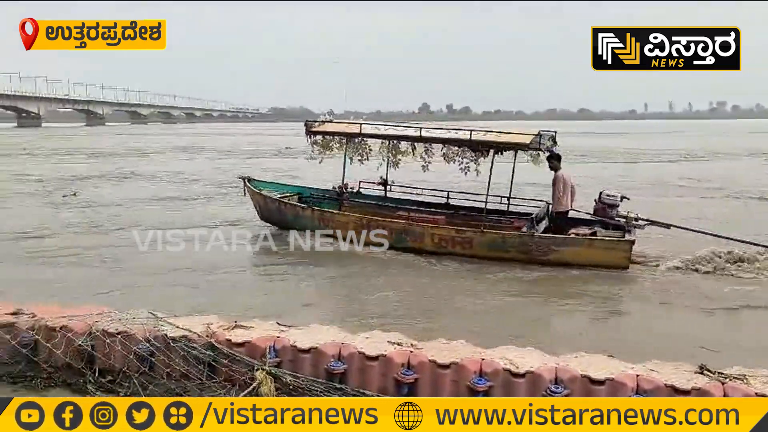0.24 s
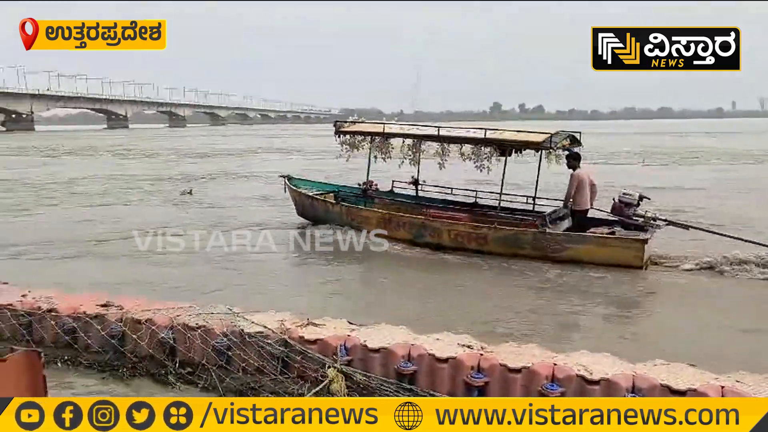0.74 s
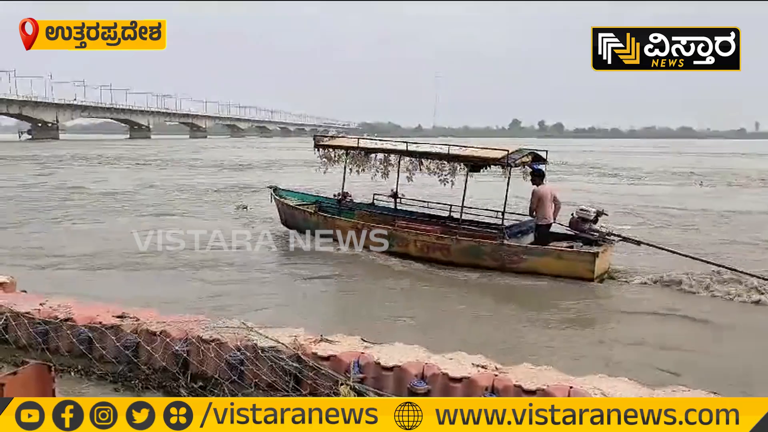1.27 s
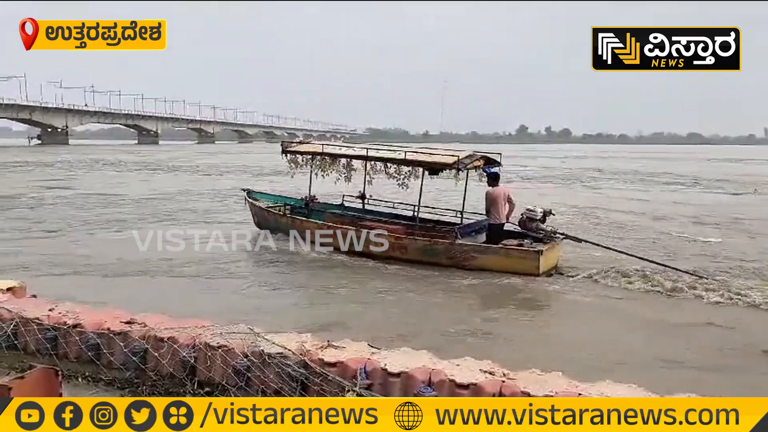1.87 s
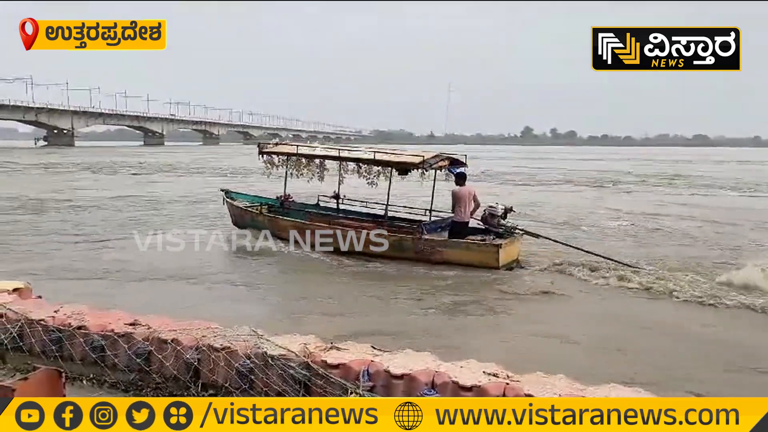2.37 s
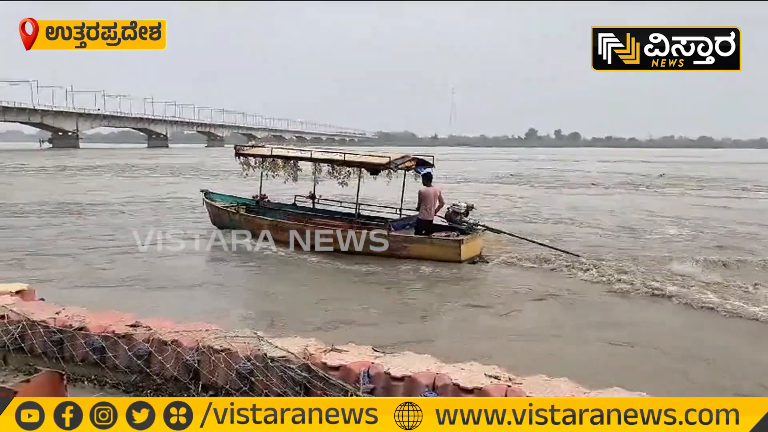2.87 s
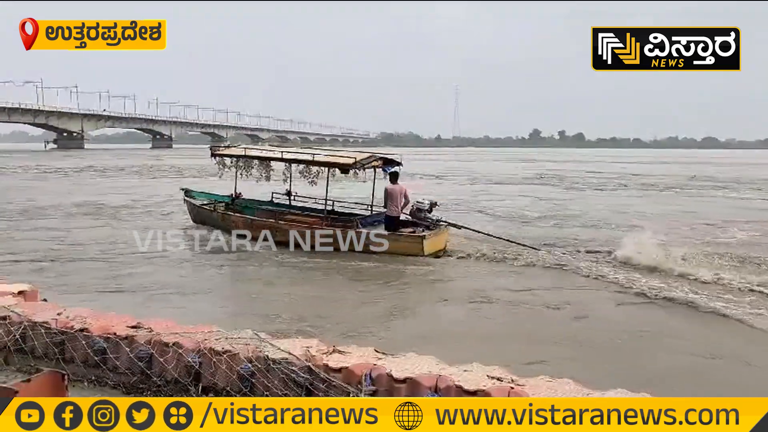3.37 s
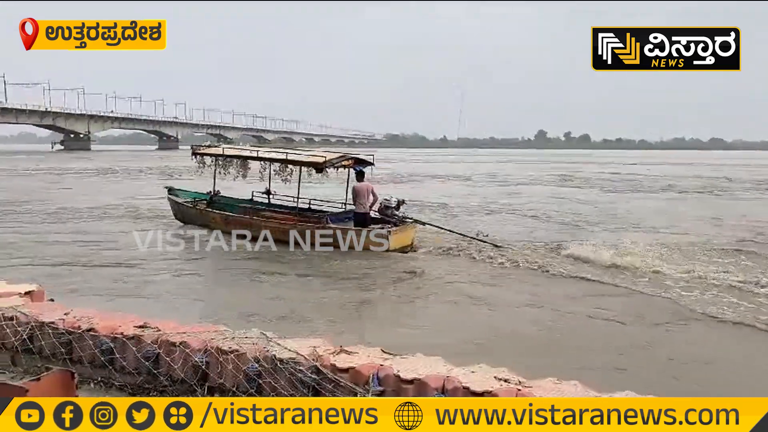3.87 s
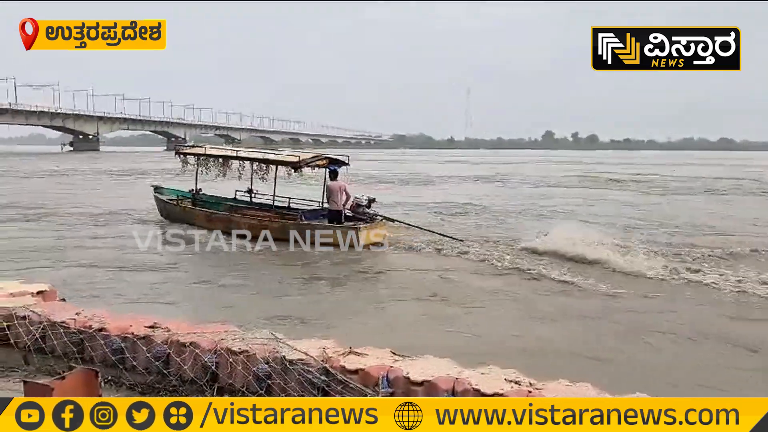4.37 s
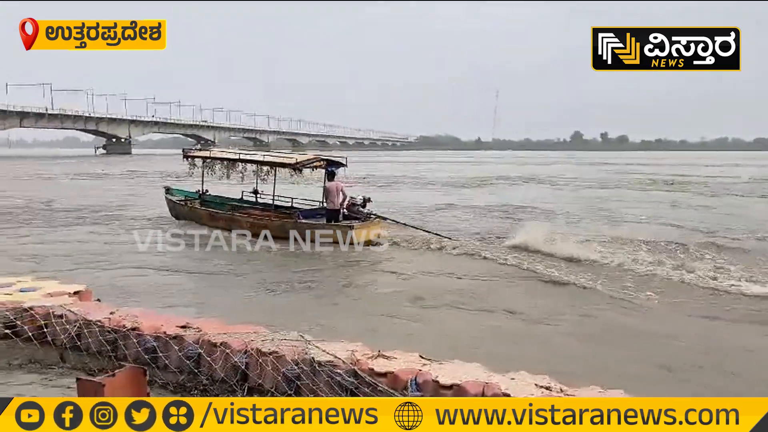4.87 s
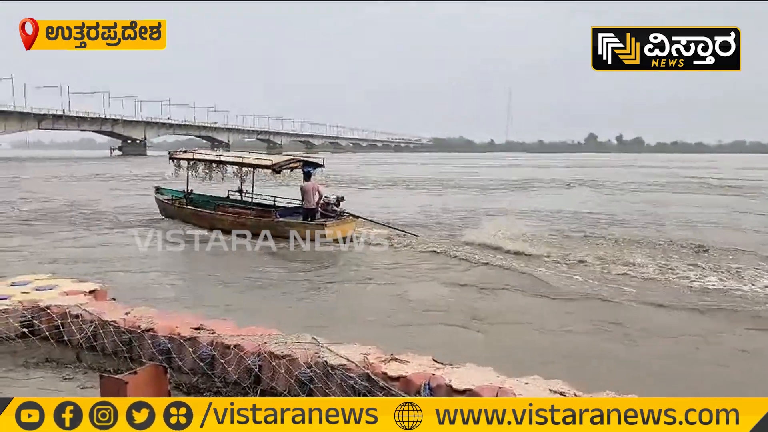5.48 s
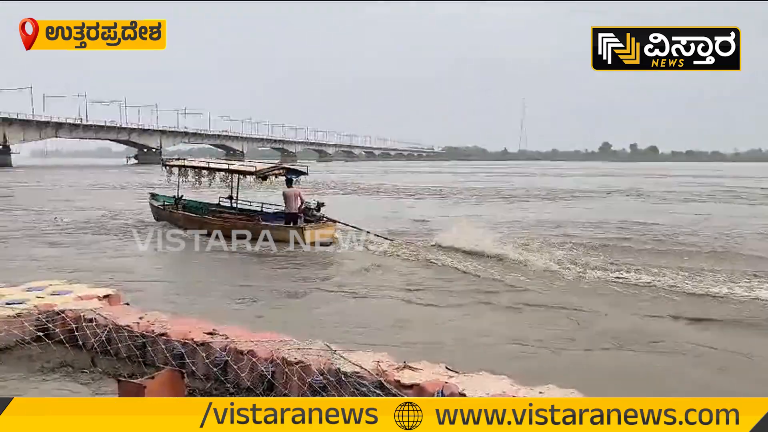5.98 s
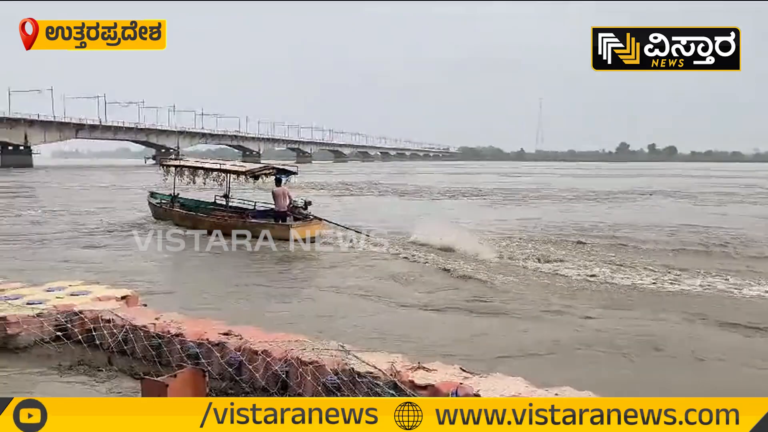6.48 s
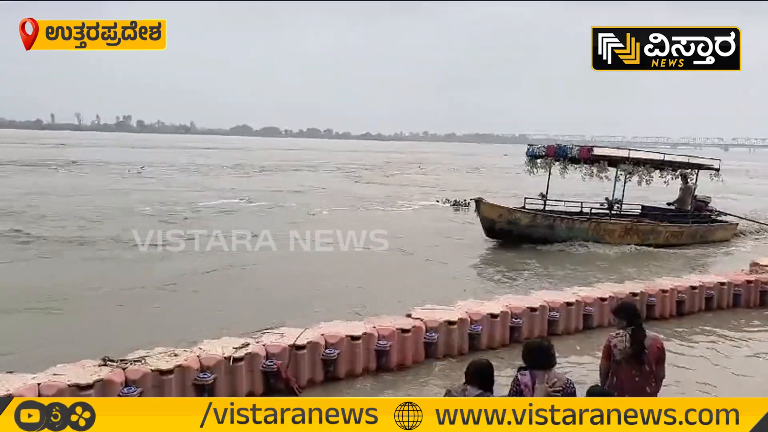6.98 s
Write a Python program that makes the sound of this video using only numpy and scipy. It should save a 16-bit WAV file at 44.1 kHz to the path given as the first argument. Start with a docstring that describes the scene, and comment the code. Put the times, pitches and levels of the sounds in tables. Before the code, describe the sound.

Rapid thumping, barking and clattering of a small boat engine pulling away over lapping water, a half-second dropout, then the engine approaching.

```python
"""On a river bank, a long-tail boat passes with its open single-cylinder diesel firing about 33 times a second.
Each firing gives a low thump, an exhaust bark that rings the pipe and hull, and a clatter of struck metal;
the engine picks up a little as the boat turns away, while rising bubble tones plop at the floating barrier.
The sound cuts out for half a second and returns with the boat approaching."""
import sys
import numpy as np
from scipy import signal
from scipy.fft import rfft, irfft, next_fast_len
from scipy.io import wavfile
from scipy.ndimage import map_coordinates

SR = 44100
rng = np.random.default_rng(int(sys.argv[2]) if len(sys.argv) > 2 else 0)


def store_wav(level_fs):
    """Save 16-bit WAV to argv[1]."""
    pcm = np.round(np.clip(np.atleast_2d(level_fs), -1, 1) * 32767)
    wavfile.write(sys.argv[1], SR, pcm.T.astype(np.int16))


N = 318843

# relative spectrum of the engine's knock from abeam, also used for the exhaust crack: f/Hz, level/dB per Hz
KNOCK_SPECTRUM = [(300, -47.5), (750, -8), (1050, -5), (1260, -0.5), (1421, -5), (1593, -5.5), (1766, -3.5),
                  (1900, -4.5), (2110, 1.5), (2412, -0.5), (2627, -4), (2885, -6), (3962, -9.5),
                  (6500, -65.5)]
SILENCE_START_S, SILENCE_END_S = 6.412, 6.928
THROTTLE_S = 2.365  # the throttle opens once


def amp(db):
    """Level definition: decibels to amplitude gain."""
    return 10 ** (np.asarray(db) / 20)


def unit(x):
    """Power normalisation: scale to rms 1."""
    return x / np.sqrt(np.mean(x ** 2) + 1e-20)


def along(points, hz):
    """Logarithmic frequency scale: interpolate (f/Hz, value) points on it."""
    f, v = np.transpose(points)
    return np.interp(np.log(hz + 1), np.log(f + 1), v)


def curves(rows):
    """Linear interpolation: one value per sample for each column after the time."""
    s, *columns = np.transpose(rows)
    return [np.interp(np.arange(N) / SR, s, column) for column in columns]


def wobble(rate):
    """Slow random modulation: a smooth curve through rate random knots a second."""
    knots = rng.standard_normal(int(N * rate / SR) + 4)
    return map_coordinates(knots, [np.arange(N) * rate / SR])


def filtered(x, response):
    """Linear filtering: multiply the spectrum of x by a complex response of frequency."""
    m = next_fast_len(N + SR // 2)
    return irfft(rfft(x, m) * response(np.fft.rfftfreq(m, 1 / SR)), m)[..., :N]


def coloured(pair, spectrum):
    """Interchannel coherence: mid and side weights make two unrelated signals a partly alike pair of rms 1."""
    # left-right likeness: f/Hz, correlation
    likeness = [(130, 0.96), (300, 0.72), (640, 0.75), (1400, 0.69), (3100, 0.66), (6800, 0.3),
                (15000, 0.34)]

    def weights(hz):
        turn = np.arccos(np.clip(along(likeness, hz), -1, 1)) / 2
        return amp(along(spectrum, hz)) * [np.cos(turn), np.sin(turn)]

    mid, side = filtered(pair, weights)
    return unit(np.array([mid + side, mid - side]))


def pulses(cycle, offset, scatter_db, jitter_s):
    """Quasi-periodic excitation: one impulse a cycle, slightly uneven in size and time."""
    turns = np.arange(-1, 260) + offset
    size, late = rng.standard_normal((len(turns), 2)).T
    at = np.interp(turns, cycle, np.arange(N), left=-SR, right=2 * SR + N)
    at = np.round(at + late * jitter_s * SR).astype(int)
    inside = (at >= 0) & (at < N)
    return np.bincount(at[inside], amp(scatter_db * size[inside]), N)


def ring(x, tail):
    """Impulse response: convolve x with each channel of a tail."""
    return signal.fftconvolve(x[None], np.atleast_2d(tail), axes=1)[:, :N]


def causal(spectrum, size=8192):
    """Minimum phase: folding the cepstrum gives the most compact ring with this spectrum."""
    cepstrum = irfft(np.log(amp(along(spectrum, np.fft.rfftfreq(size, 1 / SR)))))
    cepstrum[1:size // 2] *= 2
    cepstrum[size // 2 + 1:] = 0
    return irfft(np.exp(rfft(cepstrum)))[:size // 2]


def approaching(before, after):
    """Two states: one value while the boat departs, another from the middle of the silence on."""
    return np.where(np.arange(N) / SR < (SILENCE_START_S + SILENCE_END_S) / 2, before, after)


def facing(views):
    """Source directivity: cross-fade between the sounds of the boat's sides as it turns."""
    # the side that faces the bank: t/s, side (0 beam, 1 quarter, 2 stern, 3 bow)
    side_heard = [(0, 0), (1.7, .05), (2.25, .35), (2.65, .92), (3.8, 1.05), (5.0, 1.85), (6.41, 2.0),
                  (6.9, 3.0)]
    aspect = np.clip(curves(side_heard)[0], 0, len(views) - 1)
    return sum(np.clip(1 - abs(aspect - side), 0, 1) * view for side, view in enumerate(views))


def course():
    """Inverse-distance law and interaural-style delay: level/dB with distance, delay/s of the left microphone."""
    nearest_m, boat_m_per_s, approach_m = 20.5, 3.57, 19.8
    # bearing to the right of the microphones, swinging from start towards end as the boat turns away
    start_deg, end_deg, swing_s, approach_deg = 35.4, -5.5, 3, 48
    port_delay_s = 0.00038  # between the two microphones, for a sound from one side
    t = np.arange(N) / SR
    distance = approaching(np.hypot(nearest_m, boat_m_per_s * t), approach_m)
    swing = np.exp(-(t / swing_s) ** 2)
    bearing = approaching(end_deg + (start_deg - end_deg) * swing, approach_deg)
    return 20 * np.log10(nearest_m / distance), port_delay_s * np.sin(np.radians(bearing))


def crank():
    """Phase as integrated frequency: engine cycles, whole numbers where the exhaust opens."""
    slow_hz, open_hz, approach_hz = 32.727, 34.397, 33.0  # low throttle, opened up, later approach
    pickup_s = .972  # time taken to reach the new speed
    first_s, first_approach_s = .011, 6.9546  # first firing of the departure and of the approach
    t = np.arange(N) / SR
    to_gain = 1 - np.clip((t - THROTTLE_S) / pickup_s, 0, 1)
    rate = open_hz - (open_hz - slow_hz) * to_gain ** 2
    departure = np.cumsum(rate) / SR - slow_hz * first_s
    done = np.ceil(np.interp(first_approach_s, t, departure))
    return approaching(departure, done + approach_hz * (t - first_approach_s))


def firing_levels(distance_db):
    """Superposed level changes: exhaust and knock (dB) follow the side heard, the distance and the load."""
    # at the nearest distance before load, rows beam, quarter, stern, bow: exhaust level/dB, knock level/dB
    side_levels = [(-19, -21.5), (-17, -18), (-17.5, -19), (-21.5, -26)]
    load_rise_s = 0.28  # load changes the sound sooner than the speed rises
    load_changes = (1.5, -2.5)  # dB: the exhaust grows louder, the knock softer
    load = approaching(np.clip((np.arange(N) / SR - THROTTLE_S) / load_rise_s, 0, 1), 0)
    return [facing(side_db) + distance_db + load_db * load
            for side_db, load_db in zip(np.transpose(side_levels), load_changes)]


def treble_levels():
    """Common modulation: rattle and hiss (dB) swell and sink together."""
    # treble as the boat departs, before the trim and swings below: t/s, level/dB
    treble_curve = [(0.05, -31.5), (1.19, -30), (1.31, -26), (2.38, -25), (2.73, -29.5), (4.08, -29),
                    (6.03, -31), (6.1, -27), (6.35, -28)]
    rattle_trim_db, hiss_mean_db = -2, -33.5
    rattle_swing, hiss_swing = 1.3, 0.41  # how far each follows the treble's swells
    ahead_rattle_db, ahead_hiss_db = -41, -46  # from ahead, the hull hides the treble
    treble_db, = curves(treble_curve)
    mean_db = treble_db.mean()
    swell_db = treble_db - mean_db
    rattle_db = approaching(mean_db + rattle_trim_db + rattle_swing * swell_db, ahead_rattle_db)
    hiss_db = approaching(hiss_mean_db + hiss_swing * swell_db, ahead_hiss_db)
    return rattle_db, hiss_db


def river(db=-34, swell_db=2, plop_db=-1, rise=4.4):
    """Bubble resonance over broadband flow noise: water washes, trapped air rings and rises in pitch."""
    # relative spectrum of the wash: f/Hz, level/dB per Hz
    wash_spectrum = [(60, -9.5), (200, -20), (600, -12.5), (900, -19), (1600, -23.5), (4000, -3.5),
                     (15000, -16.5)]
    # plops at the barrier: t/s, start f/Hz, level/dB before plop_db and the soft onset, t60/s
    plop_table = [(1.368, 863, -4, 0.067), (2.632, 794, -6, 0.085), (4.541, 647, -16, 0.06),
                  (4.59, 810, -18.5, 0.058), (4.98, 710, -13, .08), (6.15, 710, -19, 0.13),
                  (6.28, 514, -9.5, 0.17)]
    wash = unit(filtered(rng.standard_normal((2, N)), lambda hz: amp(along(wash_spectrum, hz))))
    water = amp(db + swell_db * wobble(7.5)) * wash
    t = np.arange(SR // 4) / SR
    for s, hz, level, t60 in plop_table:
        angle = 2 * np.pi * hz * (t + rise * t ** 2 / 2)
        spread = rng.uniform(0.42, 0.98) * np.array([[1], [-1]])  # off to one side, so the ports differ in phase
        fade = amp(level + plop_db - 60 * t / t60) * (1 - np.exp(-t / 0.012))
        water[:, round(s * SR):][:, :len(t)] += fade * np.sin(angle + spread)
    return water


def rumble(cycle, db=-26, throb=0.058, swell_db=-0.3):
    """Amplitude-modulated noise: turbulent gas and churned water swell with each firing."""
    # relative spectrum of the turbulence: f/Hz, level/dB per Hz
    rumble_spectrum = [(20, -27), (50, -11.5), (85, -7), (120, -2), (170, -4.5), (280, -13), (500, -8.5),
                       (850, -14.5), (1300, -29), (4000, -86.5)]
    swell = (1 + throb * np.cos(2 * np.pi * (cycle - .1))) * amp(swell_db * wobble(9.1))
    return amp(db) * coloured(swell * rng.standard_normal((2, N)), rumble_spectrum)


def clatter(cycle, spectra, repeat, steady_db, scatter_db, damping, later_db):
    """Impact excitation: blows on the block ring partly alike in every cycle, partly as fresh noise."""
    # blows: cycles after the exhaust opens, level/dB before later_db, t60/s before damping
    blow_table = [(-.255, -0.5, 0.072), (-.05, -8.5, 0.038), (.08, -10, 0.039), (.33, -5.5, 0.36)]
    t = np.arange(SR // 10) / SR
    alike, power = np.zeros((2, N)), np.zeros(N)
    for k, (offset, db, t60) in enumerate(blow_table):
        gain = amp(db + later_db * (k > 0))  # later_db shifts every blow after the first
        blows = gain * pulses(cycle, offset, scatter_db, jitter_s=.00002)
        fade = amp(-60 * t * damping / t60)
        alike += ring(blows, fade * rng.standard_normal((2, len(t))))
        power += ring(blows ** 2, fade ** 2)[0]
    envelope = np.sqrt(abs(power) / power.mean() + amp(steady_db) ** 2)
    fresh = envelope * rng.standard_normal((2, N))
    share = np.clip(repeat, 0, 1)
    metal = np.sqrt(share) * unit(alike) + np.sqrt(1 - share) * unit(fresh)
    return facing([coloured(metal, spectrum) for spectrum in spectra])


def hiss(cycle):
    """Turbulence noise: the highest treble, brief bursts timed by the engine's blows."""
    # relative spectra from abeam and astern: f/Hz, level/dB per Hz
    hiss_abeam = [(4000, -59), (7400, -7), (9000, -4.5), (11500, 3.5), (12800, 1.5), (14900, -0.5),
                  (15900, -21.5)]
    hiss_astern = [(4000, -60), (7400, 1), (9000, 0), (11500, -1.5), (12400, -3), (13300, -2), (15900, -5)]
    return clatter(cycle, [hiss_abeam, hiss_astern], repeat=0.3, steady_db=-6.0, scatter_db=3.0,
                   damping=1.5, later_db=1.5)


def rattle(cycle):
    """Struck-metal resonance: the engine's blows heard in the upper treble."""
    # relative spectra from abeam and astern: f/Hz, level/dB per Hz
    rattle_abeam = [(2000, -66.5), (4250, -10.5), (4650, -5.5), (4900, -3.5), (5450, -4), (5900, -5.5),
                    (6850, -4), (7400, -13), (11000, -72.5)]
    rattle_astern = [(2000, -72), (4300, -1.5), (4700, -3), (5050, 1), (5450, -2), (5850, -6), (6850, -8.5),
                     (7500, -21.5), (11000, -73.5)]
    return clatter(cycle, [rattle_abeam, rattle_astern], repeat=.25, steady_db=-9, scatter_db=1.5,
                   damping=.9, later_db=-4)


def ticks(cycle, offset=-0.029, t60=0.024):
    """Modal ringing: once a cycle the valve gear pings a few steel modes, each time at new strengths."""
    # steel modes of the valve gear: f/Hz, relative level/dB
    valve_modes = [(3750, -7), (4670, 5), (4980, -8.5), (5380, -1)]
    t = np.arange(SR // 15) / SR
    pings = np.zeros((2, N))
    for hz, db in valve_modes:
        phase = rng.uniform(0, 2 * np.pi, (2, 1))
        ping = amp(-60 * t / t60) * np.sin(2 * np.pi * hz * t + phase)
        pings += amp(db) * ring(pulses(cycle, offset, scatter_db=1.5, jitter_s=.0002), ping)
    return unit(pings)


def knock(cycle):
    """Structure-borne sound: combustion knock and piston blows ring the block."""
    # relative spectra from the quarter and astern: f/Hz, level/dB per Hz
    knock_quarter = [(300, -49.5), (750, -9.5), (1050, -2), (1300, 5.5), (1460, -5), (1650, 6.5),
                     (1950, -3.5), (2200, 2), (2500, -1), (2900, -3.5), (3960, -9.5), (6500, -63)]
    knock_astern = [(300, -50.5), (750, -1.5), (1077, -8.5), (1163, -10.5), (1507, -4.5), (1593, -0.5),
                    (1766, -6.5), (1895, 3.5), (2024, -6.5), (2196, -0.5), (2326, -4), (2584, -11),
                    (3962, -12), (6500, -66.5)]
    return clatter(cycle, [KNOCK_SPECTRUM, knock_quarter, knock_astern], repeat=0.42, steady_db=-3,
                   scatter_db=2.0, damping=0.63, later_db=-3.5)


def thump(cycle, crest=0.01, shake_db=-34.5, waver_db=0.8):
    """Harmonic series: the lowest three orders, the engine's steady shake and the push of gas leaving the pipe."""
    # bass as the boat departs: t/s, second order level/dB before trim, third order level/dB re second
    bass_curve = [(0.05, -19, -1), (1.26, -17.5, -5.5), (2.33, -23.5, -1.5), (2.68, -20, -6),
                  (4.33, -26, -4), (4.89, -23, -3), (6.35, -26, 0)]
    trim_db, ahead_db, ahead_third_db = -1, -20.5, -5
    bass_db, third_db = curves(bass_curve)
    second = approaching(bass_db + trim_db, ahead_db)
    third = second + approaching(third_db, ahead_third_db)
    angle = 2 * np.pi * (cycle - crest)
    return sum(np.sqrt(2) * amp(db + waver_db * wobble(9)) * np.cos(order * angle)
               for order, db in enumerate([shake_db, second, third], 1))


def hull(x, count):
    """All-pass resonance: the open hull holds sound at its modes and gives it back late, count times over."""
    # hull resonances: f/Hz, width/Hz
    hull_modes = [(150, 26), (236, 8.1), (300, 24), (550, 30), (605, 15)]

    def delay(f):
        stages = [(c * c - f * f - 1j * f * w) / (c * c - f * f + 1j * f * w) for c, w in hull_modes]
        return np.prod(stages, axis=0) ** count

    return filtered(x, delay)


def honk(bark, ring_hz=557, width_hz=16, db=7, fade_s=0.41):
    """Band-pass resonance: at first a narrow ring stands out of the exhaust; it fades as the boat moves on."""
    ringing = filtered(bark, lambda f: 1j * f * width_hz / (ring_hz ** 2 - f * f + 1j * f * width_hz))
    return amp(db) * np.exp(-(np.arange(N) / SR / fade_s) ** 2) * ringing


def exhaust(cycle, echo_db=-15, echo_t60=0.088, crack_db=-18, crack_t60=0.0014):
    """Source and filter: every firing rings the pipe; its colour turns with the boat, and the bank answers."""
    # exhaust pipe and hull as heard from four sides: f/Hz, relative level/dB
    from_beam = [(60, -17), (131, -4), (164, 1.5), (196, 2.5), (262, -8), (350, 2.5), (480, -3.5),
                 (556, -6), (622, -16), (700, -8), (780, -8.5), (818, 0), (860, -9), (960, -6),
                 (1130, -21.5), (4000, -50.5)]
    from_quarter = [(60, -27), (138, -5), (172, 0), (206, -4), (241, 3), (275, -10.5), (335, 0), (378, 2),
                    (450, 1.5), (500, -8), (530, -14.5), (585, -15), (722, -16), (791, -10), (1032, -23.5),
                    (4000, -50.5)]
    from_stern = [(60, -32), (138, -8), (205, 0.5), (241, 2), (280, -17.5), (340, -1), (378, 0),
                  (475, -14.5), (530, -7), (653, -24), (722, -12.5), (800, -7), (1031, -30), (1169, -20.5),
                  (4000, -63.5)]
    from_bow = [(60, -32), (132, -15), (198, 3.5), (240, -12), (297, 3), (363, -7.5), (396, -1), (462, -17),
                (570, -4.5), (710, -7), (792, -0.5), (870, -30.5), (1122, -30), (4000, -53.5)]
    firings = pulses(cycle, 0, scatter_db=0.5, jitter_s=.00004)

    def pipe(spectrum):
        return -unit(ring(firings, causal(spectrum))[0])

    views = [hull(pipe(spectrum), count=1) for spectrum in (from_beam, from_quarter, from_stern)]
    views.append(hull(pipe(from_bow), count=4))  # from ahead, the whole hull lies in the way
    bark = facing(views)
    t = np.arange(SR // 8) / SR
    bursts = ring(firings, amp(-60 * t / crack_t60)) * rng.standard_normal((2, N))
    crack = coloured(bursts, KNOCK_SPECTRUM)
    echo_tail = rng.standard_normal((2, len(t))) * amp(-60 * t / echo_t60)
    echo = unit(ring(np.diff(bark, prepend=0), echo_tail))
    return bark + amp(echo_db) * echo + amp(crack_db) * crack


def scene():
    """Superposition: the departing engine moves from the right to about the centre over the sound of the river."""
    cycle = crank()
    distance_db, delay_s = course()
    exhaust_db, knock_db = firing_levels(distance_db)
    rattle_db, hiss_db = treble_levels()
    ticks_db = rattle_db + facing([-6.0, -9, 0.5, -6.5])  # the valve gear is most exposed from astern
    bark = amp(exhaust_db) * exhaust(cycle)
    boat = rumble(cycle) + thump(cycle) + bark + honk(bark)
    boat += amp(hiss_db) * hiss(cycle) + amp(rattle_db) * rattle(cycle)
    boat += amp(ticks_db) * ticks(cycle) + amp(knock_db) * knock(cycle)
    ports = [map_coordinates(x, [np.arange(N) + sign * delay_s * SR / 2], order=5, mode="nearest")
             for x, sign in zip(boat, (-1, 1))]
    return river() + np.array(ports)


def record(dry):
    """Linear transduction: microphone colour, the silent gap and a steep low-pass band limit."""
    # colour of the microphone pair, shared half and half: f/Hz, left minus right level/dB
    pair_balance = [(100, 0), (850, 0.3), (1300, -3.5), (1700, -3.5), (2300, -1.5), (3200, 2.5), (5000, -3),
                    (6800, 1), (8500, -1), (11300, 0), (13200, 2), (15500, -9)]
    top_hz = 15900
    t = np.arange(N) / SR
    sound = filtered(dry, lambda hz: amp(along(pair_balance, hz) * np.array([[.5], [-.5]])))
    sound *= (t < SILENCE_START_S) | (t > SILENCE_END_S)
    return filtered(sound, lambda hz: 1 / (1 + (hz / top_hz) ** 400))


dry = scene()
out = record(dry)
store_wav(out)
```